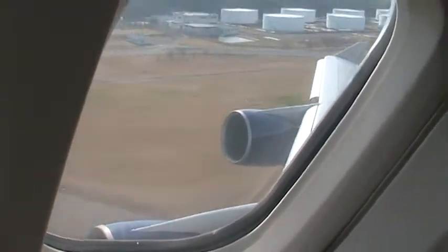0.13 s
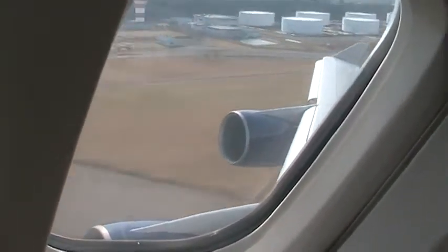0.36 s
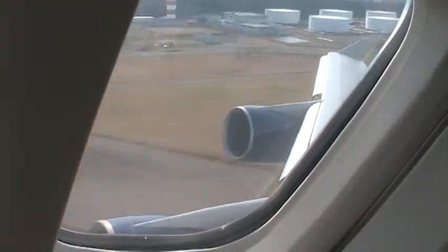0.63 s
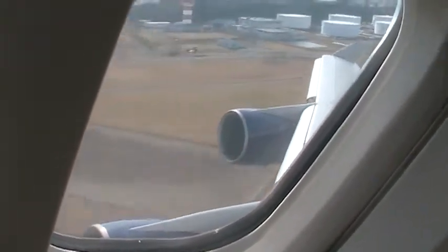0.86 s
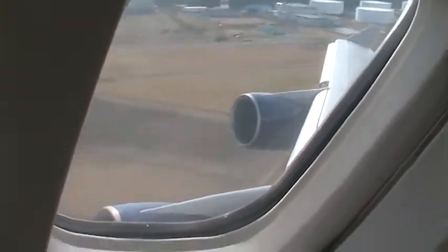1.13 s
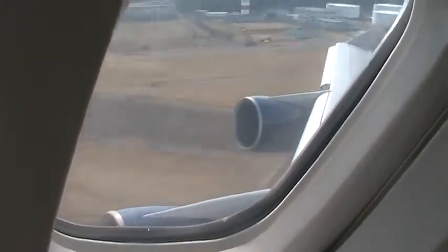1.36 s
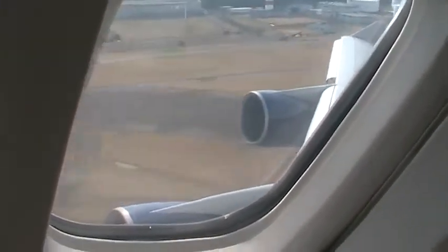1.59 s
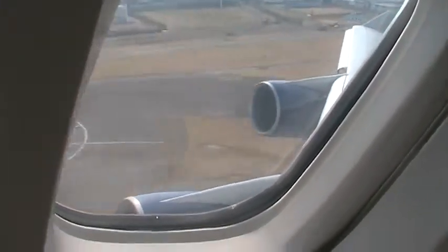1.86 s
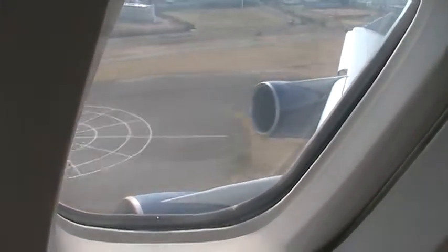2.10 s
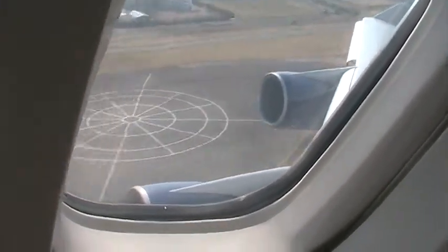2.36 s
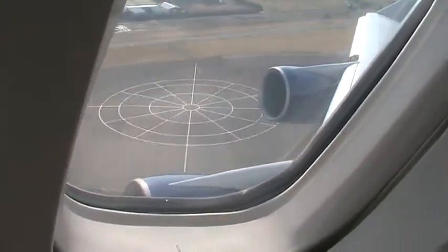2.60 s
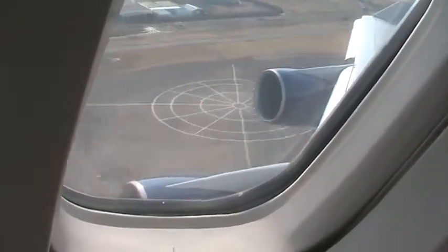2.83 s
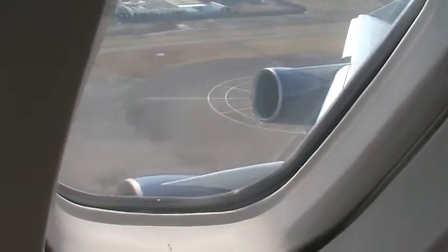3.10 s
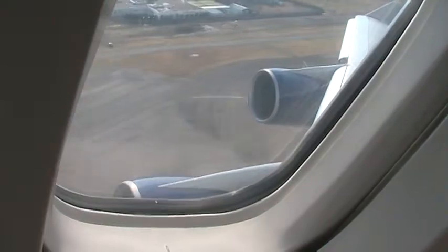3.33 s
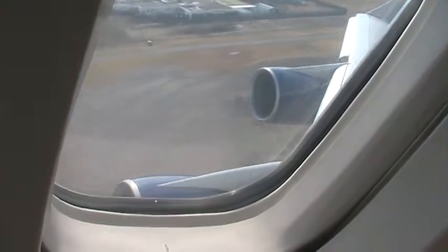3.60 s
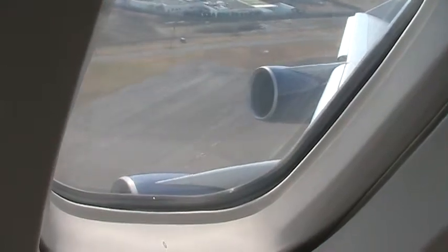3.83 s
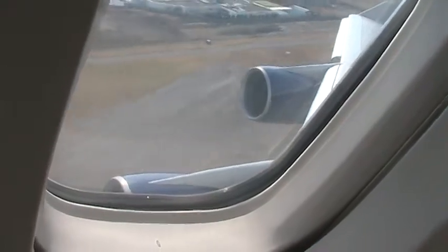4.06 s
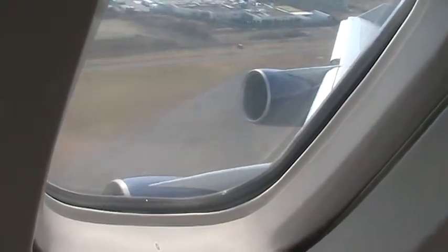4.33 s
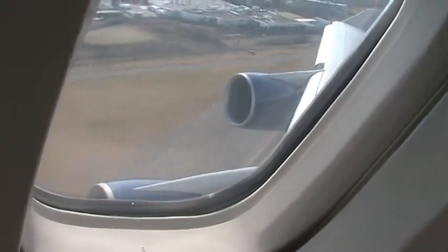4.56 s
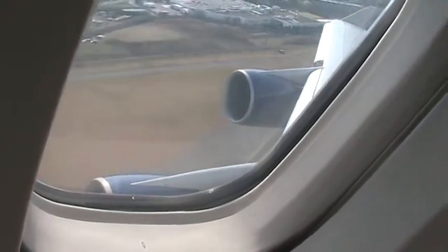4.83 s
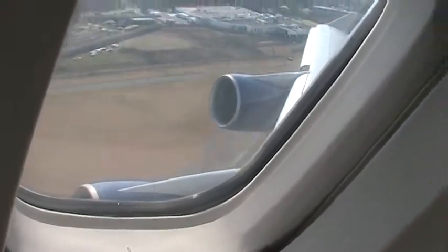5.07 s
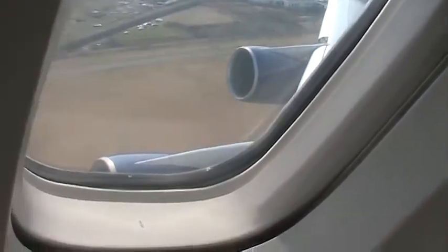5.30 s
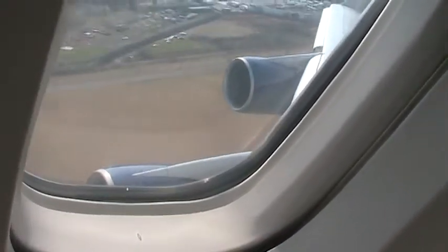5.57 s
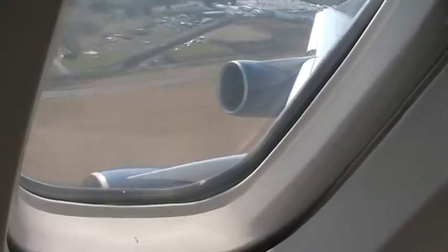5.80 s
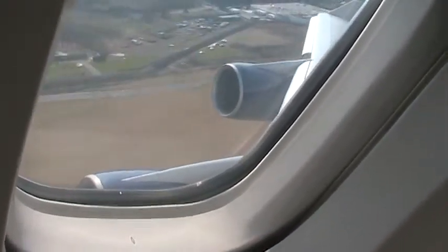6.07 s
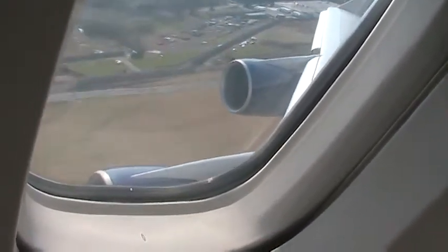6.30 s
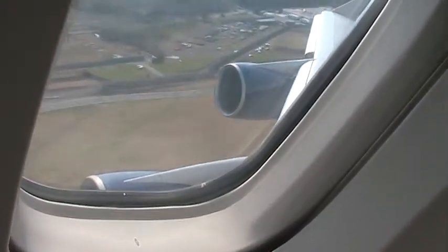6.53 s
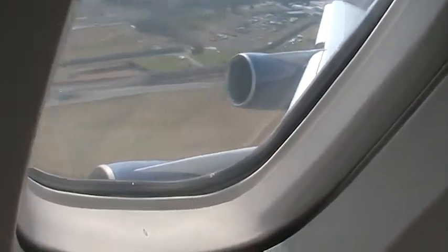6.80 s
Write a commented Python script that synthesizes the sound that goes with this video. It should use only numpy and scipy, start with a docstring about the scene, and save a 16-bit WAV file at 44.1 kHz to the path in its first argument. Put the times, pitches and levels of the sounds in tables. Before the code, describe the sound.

Heard by a window seat just after lift-off: a loud, steady, bass-heavy roar of jet engines and rushing air, muffled by the cabin wall. Several engines hum at nearly the same low pitch, so the drone throbs and beats. A thin high whine wavers within it, and loose plastic trim ticks now and then, close to the microphone.

```python
"""Inside an airliner cabin just after lift-off, by a window ahead of the wing.
Jet and airflow roar is shaped noise, coloured by the wall, its panels and the cabin air.
Four fans at nearly the same speed add combs of shaft-order sines that beat against each other.
Loose trim ticks and rattles now and then: scrapes of noise that ring a bank of decaying modes.
Gain control leans on the loud moments and a soft knee rounds the peaks."""
import sys
import numpy as np
from scipy import signal
from scipy.fft import rfft, irfft
from scipy.io import wavfile
from scipy.ndimage import uniform_filter1d

SR = 44100
rng = np.random.default_rng(int(sys.argv[2]) if len(sys.argv) > 2 else 0)


def how_loud(loudness_db):
    """Turn decibels into a plain amplitude multiplier (0 dB gives 1, 20 dB gives 10)."""
    steps = np.asarray(loudness_db, float) / 20
    return 10 ** steps


def to_wav(s):
    """Save 16-bit WAV."""
    ch = np.atleast_2d(s).T  # columns
    pcm = np.round(np.clip(ch, -1, 1) * 32767)  # PCM
    wavfile.write(sys.argv[1], SR, pcm.astype(np.int16))


N = 305172  # samples, about 6.9 s

# Roar through the wall, relative spectrum: (f/Hz, level/dB per Hz)
ROAR_SPECTRUM = [(11, -36), (30, -9), (50, -5), (100, -2), (200, -1), (330, -9), (355, -15.5), (700, -24),
                 (1250, -32.5), (2200, -35), (3500, -44), (5000, -49), (8500, -58.5), (10500, -65),
                 (13500, -69.5), (15800, -76)]
# Wall panels and cabin air that the roar excites: (f/Hz, width/Hz, level added to the roar/dB)
PANEL_RESONANCES = [(90, 16, 2), (112, 16, 2), (132, 20, -1.5), (155, 20, 2.5), (258, 30, -3),
                    (308, 45, 4.5), (580, 80, 4), (670, 40, -4), (758, 18, 5), (768, 50, 7), (900, 70, 2),
                    (980, 80, 3), (1170, 70, 3), (1595, 45, 6), (1800, 25, 4), (2130, 22, 4), (2790, 60, 4)]
# Slow swell of the hiss in the roar: (t/s, level/dB)
HISS_GUSTS = [(0, -2.5), (.5, 0), (1.8, -.5), (2.6, 0.5), (3, 0), (6, -1), (6.92, .5)]
# Likeness of left and right: (f/Hz, correlation from -1 to 1)
STEREO_LIKENESS = [(60, .998), (200, .992), (320, .98), (600, .97), (1000, .95), (1500, .82), (2800, .62),
                   (4200, .5), (7000, .47), (9000, 0), (10500, -.45), (13000, -.35), (15500, 0)]
# Balance of the two sides: (f/Hz, left minus right level/dB)
STEREO_LEAN = [(60, -0.88), (130, 0.31), (290, -1.8), (640, 0.34), (1400, 0.14), (6000, -0.35),
               (13000, 0.96)]
# The inner, outer and two far-side fans: (shaft turns a second f/Hz, head start/turns, wander/Hz)
FAN_SHAFTS = [(55.88, 0, .04), (56.557, .725, .1), (56.1, .445, .03), (56.707, .9, .03)]
# Shock waves at the blade tips repeat once a turn, inner fan: (multiple of shaft speed, rms level/dB)
INNER_FAN_ORDERS = [(1, -40), (2, -28), (3, -37), (4, -32.5), (6, -36), (9, -45.5), (11, -48), (12, -45.5),
                    (14, -50), (15, -61), (16, -60.5), (17, -50.5), (18, -52), (19, -50.5), (20, -55),
                    (21, -49.5), (25, -53.5), (26, -60.5), (28, -60), (29, -62.5), (32, -49), (34, -55),
                    (36, -53), (38, -54), (40, -55)]
# The same for the outer fan: (multiple of shaft speed, rms level/dB)
OUTER_FAN_ORDERS = [(1, -36.5), (2, -26), (3, -34.5), (10, -46.5), (12, -58.5), (19, -45.5), (26, -58),
                    (32, -52)]
# Only low hums cross from the far wing, one list a fan: (multiple of shaft speed, rms level/dB)
FAR_FAN_ORDERS = [
    [(2, -28), (3, -38)],
    [(1, -34), (2, -25.5), (3, -26)],
]
# The blade whine sinks, flares briefly, dips and returns: (t/s, level added to its order/dB)
WHINE_SWELL = [(0, 3.5), (2.5, 3), (3.1, -0.5), (5.2, -4), (5.4, 7), (5.65, -10), (6.2, 1), (6.92, 2)]
# Knocks of loose trim: (t/s, level/dB, hardness 0 scrape to 1 ring, f favoured by the spot struck/Hz)
TRIM_KNOCKS = [(.028, -36, .1, 8700), (.098, -40.5, 0, 8700), (0.1254, -17.5, .65, 8230),
               (.176, -36, 0.9, 7700), (.236, -34.5, 0, 8700), (0.2454, -25, 0.6, 8700),
               (.3316, -39, 0.7, 7700), (.5, -39, .2, 6800), (0.553, -36, 0, 8700),
               (.831, -35.5, .15, 8200), (1.0066, -17.5, 0.73, 3600), (1.178, -41.5, .05, 8700),
               (1.196, -34, 0.2, 6800), (1.51, -44.5, .2, 8700), (1.742, -38.5, .2, 8700),
               (2.47, -40, 0.2, 8700), (2.5985, -41, .4, 8700), (2.7602, -36, .1, 8700),
               (4.16, -38, .05, 8700), (4.318, -43.5, .05, 8700), (4.5517, -19.5, 0.5, 6800),
               (4.9, -42, .05, 8650), (4.97, -38.5, 0.1, 8700), (5.005, -20, 0.64, 8200),
               (5.468, -35, .05, 8700), (5.572, -38.5, .05, 8700), (5.9918, -33.5, 0.2, 8700),
               (6.23, -40, .15, 8700), (6.2543, -27.5, .45, 8200), (6.722, -34.5, .05, 8700),
               (6.7454, -34, .3, 8200)]
# What the trim rings with: (f/Hz, level/dB, time to fall 60 dB t/s)
TRIM_MODES = [(2800, -2, .07), (3800, -5, .05), (4680, -5, .07), (5470, -5, .03), (6800, -6, .03),
              (7200, -6, .03), (7720, -3, .03), (8710, 1, .035), (9360, -8, .02), (11100, -9, .02),
              (12900, -9, .025)]
# Colour of the scrape: (f/Hz, level/dB)
SCRAPE_COLOUR = [(1200, -13.5), (2500, -3.5), (4000, 1), (6500, -1.5), (8700, -2), (9500, -5.5),
                 (12500, -10), (14500, -12.5), (15800, -17.5)]

ROAR_DB = -12  # rms
WHINE_ORDER, TOP_HUM_ORDER = 32, 3
HUM_FLUTTER_DB, COMB_FLUTTER_DB = 0.8, 2.4
SOFT_RISE_S, HARD_RISE_S = 0.009, 0.0016
SOFT_T60_S, HARD_T60_S = 0.2, 0.09
FAINT_PER_S, FAINT_DB = 0.6, -48
BLOW, BLOW_LATE_S = 12.0, 0.0015  # strength against the scrape, delay after the rise
SPOT_DB, SPOT_OCTAVES = 6, 0.35
CHATTER_DB = 3.0
KNOCK_LEN = 8192  # samples
KNEE = 2.2


def evened(x):
    """Scales to rms 1."""
    return x / np.sqrt(np.mean(x ** 2) + 1e-20)


def over_frequency(points, hz):
    """Reads a table over frequency, joined on a log axis."""
    f, value = np.transpose(points)
    return np.interp(np.log(hz + 1), np.log(f + 1), value)


def over_time(points, t):
    """Reads a table over time, joined by straight lines."""
    s, value = np.transpose(points)
    return np.interp(t, s, value)


def drift(shape, top_hz, per_s):
    """Smooth random movement of rms 1 along the last axis, sampled per_s times a second."""
    spectrum = rfft(rng.standard_normal(shape))
    rolloff = np.exp(-(np.fft.rfftfreq(shape[-1], 1 / per_s) / top_hz) ** 2)
    return evened(irfft(spectrum * rolloff, shape[-1]))


def pair(z1, z2, hz):
    """Two microphone ports: alike in the bass, less alike higher up, partly opposed near the top."""
    same = over_frequency(STEREO_LIKENESS, hz)
    lean = how_loud(over_frequency(STEREO_LEAN, hz) / 2)
    right = same * z1 + np.sqrt(1 - same ** 2) * z2
    return np.array([lean * z1, right / lean])


def roar():
    """Turbulent noise coloured by wall and panels, with drifting patches and shared flicker in the hiss."""
    frames, hz = N // 1024 + 6, np.fft.rfftfreq(4096, 1 / SR)
    a, b, c, d, patches = rng.standard_normal((5, frames, len(hz)))
    patches = uniform_filter1d(patches, size=32, axis=1)  # smooth across frequency
    patches = evened(uniform_filter1d(patches, size=3, axis=0))  # and across time

    hiss = np.clip(np.log2((hz + 1) / 300) / 1.4, 0, 1)  # 0 in the rumble, 1 in the hiss
    gust_db = over_time(HISS_GUSTS, np.arange(frames) * 1024 / SR)
    flicker = drift((frames,), top_hz=7.3, per_s=SR / 1024)

    colour_db = over_frequency(ROAR_SPECTRUM, hz)
    for f, width, db in PANEL_RESONANCES:
        colour_db = colour_db + db * np.exp(-2 * ((hz - f) / width) ** 2)
    field_db = colour_db + np.outer(gust_db + 0.5 * flicker, hiss) + 0.87 * hiss * patches

    spectra = pair(a + 1j * b, c + 1j * d, hz) * how_loud(field_db)
    sound = signal.istft(spectra.transpose(0, 2, 1), nperseg=4096, noverlap=3072)[1]
    return how_loud(ROAR_DB) * evened(sound[:, :N])


def fan(shaft, orders, starts):
    """Sines on multiples of a faintly wandering shaft speed; each flutters on its way through the air."""
    shaft_hz, lead, wander_hz = shaft
    samples, steps = np.arange(N), np.arange(0, N + 200, 200)
    wander = drift(steps.shape, top_hz=0.8, per_s=SR / 200)
    wander = wander - uniform_filter1d(wander, size=300)  # the governor pulls the speed back
    speed = shaft_hz + wander_hz * wander
    turns = lead + np.cumsum(np.interp(samples, steps, speed)) / SR

    whine_db = over_time(WHINE_SWELL, steps / SR)
    flutter = drift((len(orders), len(steps)), top_hz=4.6, per_s=SR / 200)
    out = np.zeros((2, N))
    for (order, db), wobble in zip(orders, flutter):
        flutter_db = HUM_FLUTTER_DB if order <= TOP_HUM_ORDER else COMB_FLUTTER_DB
        swell_db = flutter_db * wobble
        if order == WHINE_ORDER:
            swell_db = swell_db + whine_db
        level = np.sqrt(2) * np.interp(samples, steps, how_loud(db + swell_db))  # rms to peak
        start, side = starts[order]
        angle = 2 * np.pi * (order * turns + start)
        quadrature = np.sign(side - 0.5) * np.cos(angle)  # a quarter turn ahead or behind
        out += level * pair(np.sin(angle), quadrature, order * shaft_hz)
    return out


def trim_ring(t, spot_hz):
    """Decaying modes of the trim, loudest near the spot struck, with chance levels and phases."""
    ring = np.zeros((2, len(t)))
    for f, mode_db, t60 in TRIM_MODES:
        chance = rng.standard_normal((2, 1))
        spot_db = SPOT_DB * np.exp(-(np.log2(f / spot_hz) / SPOT_OCTAVES) ** 2)
        level = how_loud(mode_db + 3.2 * chance.mean() + spot_db - 60 * t / t60)
        ring += level * np.sin(2 * np.pi * (f * t + chance.sum()) + 0.71 * chance)
    return ring


def rattles():
    """Each knock is a short scrape of noise that also rings the trim; faint touches fall at random."""
    t, hz = np.arange(KNOCK_LEN) / SR, np.fft.rfftfreq(KNOCK_LEN, 1 / SR)
    out = np.zeros((2, N + KNOCK_LEN))
    faint = [(0.01 + u * (N / SR - 0.02), FAINT_DB + 4 * v, 0.2 * w, 8700)
             for u, v, w in rng.random((round(FAINT_PER_S * N / SR), 3))]
    for s, db, hard, spot_hz in TRIM_KNOCKS + faint:
        rise = HARD_RISE_S + (SOFT_RISE_S - HARD_RISE_S) * (1 - hard) ** 5.4
        t60 = SOFT_T60_S + (HARD_T60_S - SOFT_T60_S) * hard
        after = np.maximum(t - rise, 0)
        shape = np.minimum(t / rise, 1) * how_loud(-60 * after / t60)
        shape *= 0.86 + 0.32 * how_loud(-60 * after / 0.025)  # the first snap dies faster than the tail
        shape *= how_loud(CHATTER_DB * drift(t.shape, top_hz=250, per_s=SR))  # uneven chatter

        noise = rng.standard_normal((2, KNOCK_LEN))
        scrape = irfft(pair(*rfft(noise), hz) * how_loud(over_frequency(SCRAPE_COLOUR, hz)), KNOCK_LEN)
        blow = BLOW * (np.arange(KNOCK_LEN) == round((rise + BLOW_LATE_S) * SR))
        drive = (noise[:1] + blow) * shape ** 2  # one clean blow inside the scrape
        struck = signal.fftconvolve(drive, trim_ring(t, spot_hz), axes=1)[:, :KNOCK_LEN]

        knock = (1 - hard) * evened(scrape) * shape / 2 + hard * struck / abs(struck).max()
        at = round((s - 0.003) * SR)  # the rise begins 3 ms ahead of the listed time
        out[:, at:at + KNOCK_LEN] += how_loud(db) * knock
    return out[:, :N]


def scene():
    """Roar, four fans and trim; the fans share one set of start phases, one blade pattern."""
    sound = roar()
    starts = rng.random((64, 2))  # for each order: start in turns, choice of side
    all_orders = [INNER_FAN_ORDERS, OUTER_FAN_ORDERS] + FAR_FAN_ORDERS
    for shaft, orders in zip(FAN_SHAFTS, all_orders):
        sound = sound + fan(shaft, orders, starts)
    return sound + rattles()


def band_limit(x):
    """A steep low-pass at the top of the band."""
    return signal.sosfilt(signal.butter(12, 15830, fs=SR, output="sos"), x)


def record(dry):
    """Gain control leans on power above -15 dB, then a soft knee rounds the peaks."""
    power = uniform_filter1d((dry ** 2).mean(0), size=1300)  # about 30 ms
    power_db = 10 * np.log10(abs(power) + 1e-9)
    held = dry / how_loud(0.17 * np.maximum(power_db + 15.0, 0))
    mix = KNEE * np.tanh(held / KNEE)
    return band_limit(mix)


dry = scene()
out = record(dry)
to_wav(out)
```